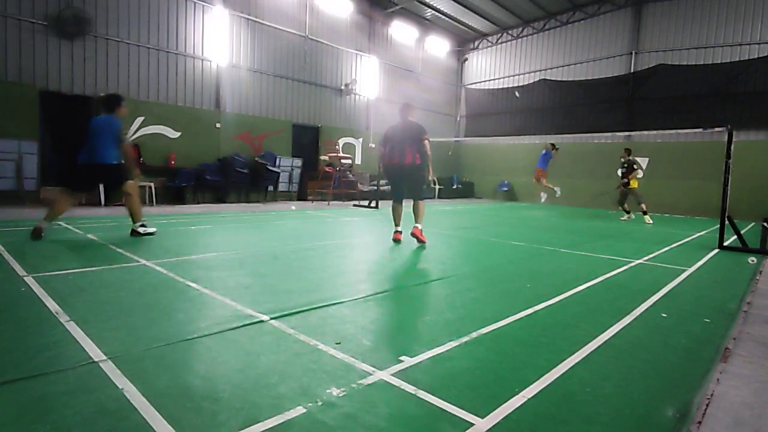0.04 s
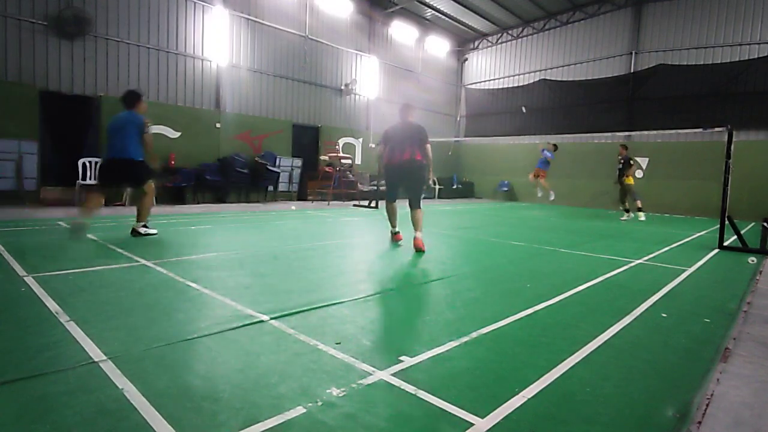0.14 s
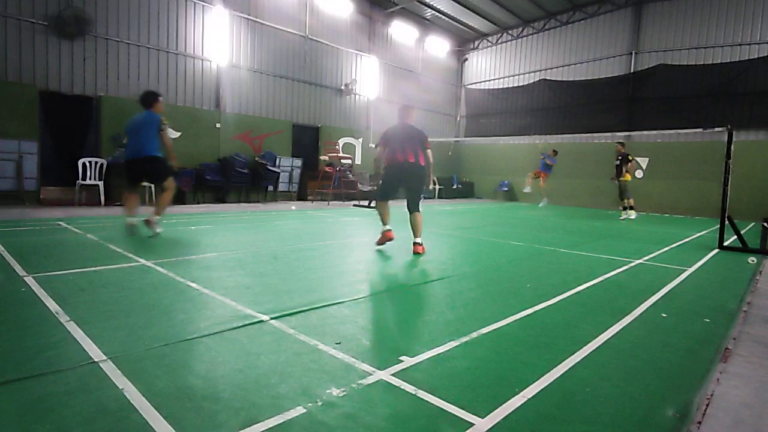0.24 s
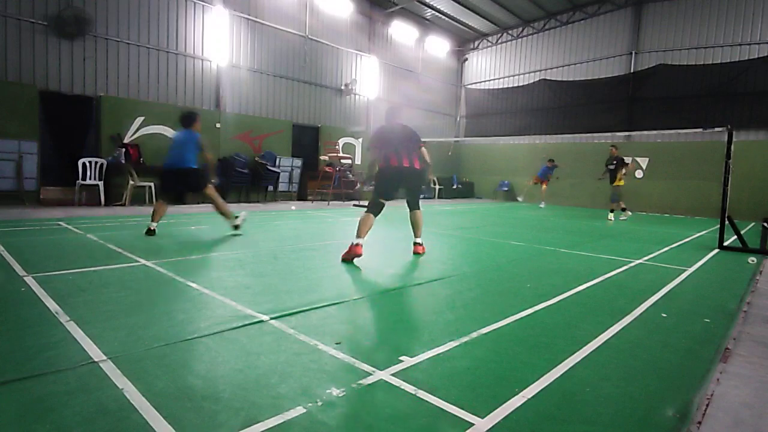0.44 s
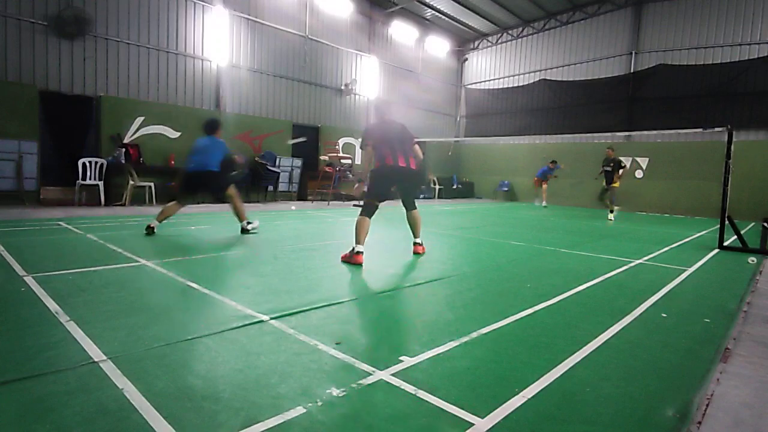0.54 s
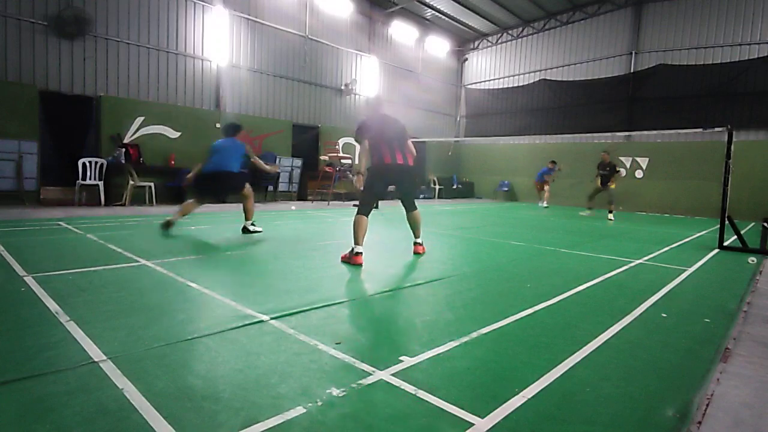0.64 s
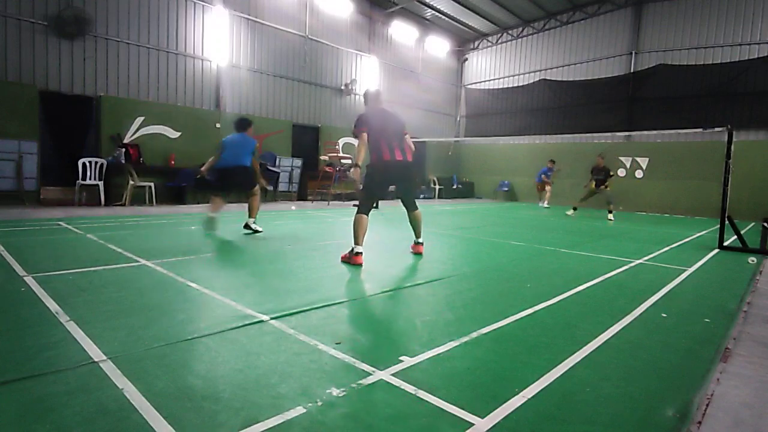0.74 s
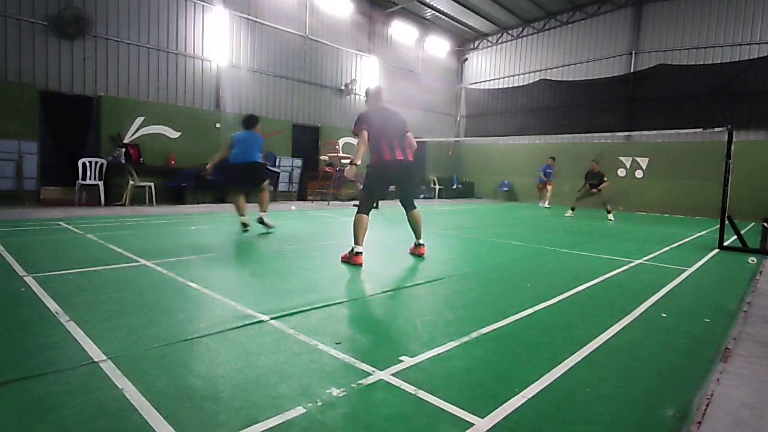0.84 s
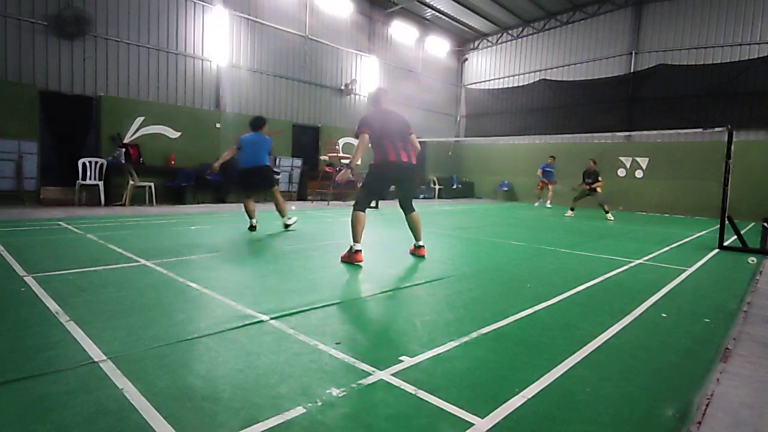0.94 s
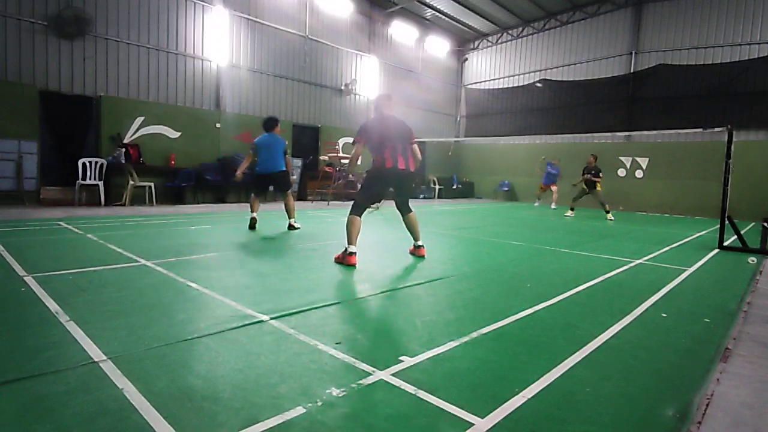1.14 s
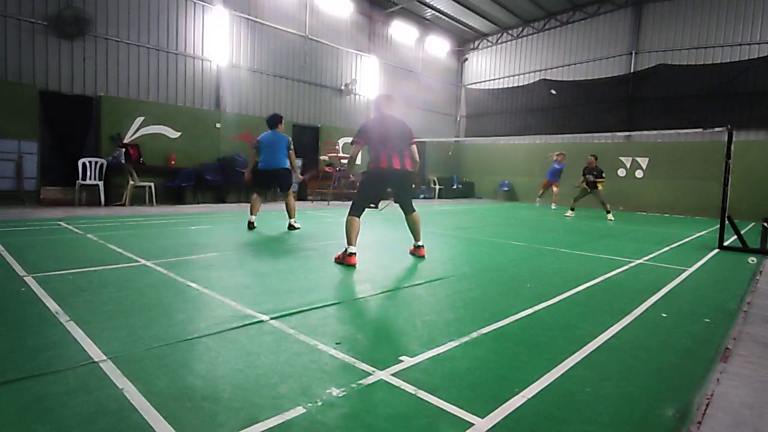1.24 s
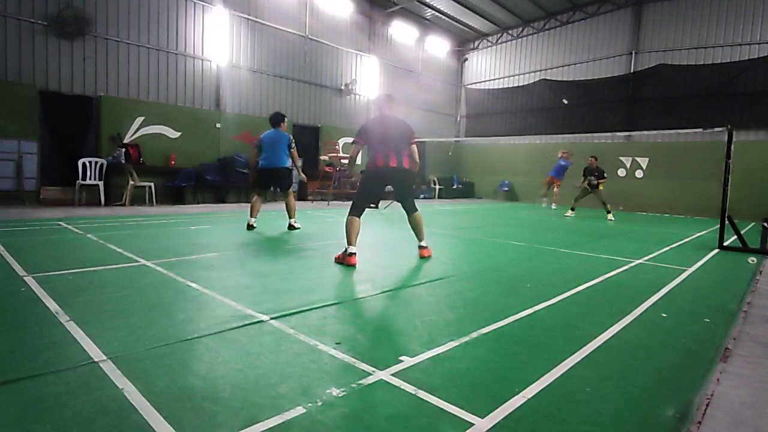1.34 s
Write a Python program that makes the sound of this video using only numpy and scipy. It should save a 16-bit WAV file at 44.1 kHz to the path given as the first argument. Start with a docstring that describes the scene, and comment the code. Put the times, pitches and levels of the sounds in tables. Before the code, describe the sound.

A badminton smash dominates: a sharp, dry crack at about 0.36 s, doubled by the floor, with a brief racket ring and a long bright roar in a large metal hall. Before it, an older squeak fades, and shoes scuff and squeak at 0.2-0.25 s. A dull thud, perhaps the return hit, lands at 0.75 s, then softer knocks until 1.0 s and a tiny squeak at 0.97 s, over low hum.

```python
"""A large sheet-metal hall: a badminton smash cracks, bounces off the floor and roars in a long bright tail.
Crack and hall are shaped noise; decaying sines ring the racket. Shoes squeak as rough tones with overtones and
scuff as a noise swell; dull thuds, the loudest perhaps the return hit, are decaying sines with a noise slap.
An earlier squeak still fades as narrow noise, and the hall hums as filtered noise with wavering low tones.
Two microphone ports colour left and right."""
import sys
import numpy as np
from scipy import signal
from scipy.fft import rfft, irfft, next_fast_len
from scipy.io import wavfile
from scipy.ndimage import uniform_filter1d

SR = 44100
rng = np.random.default_rng(int(sys.argv[2]) if len(sys.argv) > 2 else 0)


def pcm_store(signal):
    """Save signal as 16-bit PCM."""
    levels = np.round(np.clip(np.atleast_2d(signal), -1, 1) * 32767)
    wavfile.write(sys.argv[1], SR, levels.astype(np.int16).T)


N = 61739
T = np.arange(N) / SR  # seconds


def amp(db):
    """Decibels to an amplitude factor."""
    return 10 ** (np.asarray(db) / 20)


def unit(x):
    """Scale a signal to an RMS of 1."""
    return x / np.sqrt(np.mean(x ** 2) + 1e-20)


def along(points, hz):
    """Read a curve of (Hz, value) points on a log frequency axis."""
    point_hz, value = np.transpose(points)
    return np.interp(np.log(hz + 1), np.log(point_hz + 1), value)


def filtered(x, response):
    """Multiply the spectrum of x by a response of frequency."""
    size = next_fast_len(N + SR // 2)
    spectrum = rfft(x, size) * response(np.fft.rfftfreq(size, 1 / SR))
    return irfft(spectrum, size)[..., :N]


def peak(centre_hz, width_hz):
    """A causal resonance: it rings only after it is struck."""
    return lambda f: 1j * f * width_hz / (centre_hz ** 2 - f * f + 1j * f * width_hz)


def band_noise(shape, centre_hz, width_hz):
    """White noise through the same resonance twice, RMS 1."""
    noise = rng.standard_normal(shape)
    return unit(filtered(noise, lambda f: peak(centre_hz, width_hz)(f) ** 2))


def diffuse(pair):
    """Mix two unrelated signals into left and right, alike in the bass and mostly unrelated above."""
    # Each row: frequency in Hz, likeness of left and right (1 is identical, 0 unrelated).
    likeness = [(30, .99), (90, 0.67), (180, .87), (350, 0.79), (700, 0.16), (1400, -0.16), (3000, 0.02),
                (12000, -0.076)]
    turn = lambda hz: np.arccos(np.clip(along(likeness, hz), -1, 1)) / 2
    mid, side = filtered(pair, lambda hz: np.array([np.cos(turn(hz)), np.sin(turn(hz))]))
    return np.array([mid + side, mid - side])


def impulse(start_s, response):
    """One click with this colour, energy 1."""
    click = filtered(1. * (np.arange(N) == round(start_s * SR)), response)
    return click / np.linalg.norm(click)


def blow(start_s, rise_s, t60_s):
    """Envelope of something struck: fast rise, exponential fall."""
    t = np.clip(T - start_s, 0, None)
    return (1 - np.exp(-t / rise_s)) * amp(-60 * t / t60_s)


def swell(start_s, length_s):
    """Envelope of something rubbed: a rounded swell."""
    return np.sqrt(np.abs(np.sin(np.pi * np.clip((T - start_s) / length_s, 0, 1))))


def hall(x, wet_db, far_s=.081):
    """Reverberation: the near walls answer first, then the far walls and a tail that decays by frequency."""
    # Decay of the far tail. Each row: frequency in Hz, time to fall 60 dB in seconds.
    far_t60 = [(150, 3.7), (400, 1.25), (1000, 2.88), (3000, 2.9), (8500, 1.92), (14000, 1.52)]
    # Colour of the near walls' answer. Each row: frequency in Hz, level in dB.
    near_colour = [(200, -7.5), (600, -2), (2000, -2.5), (8000, -4), (13000, 2)]
    near_s, near_rise_s, near_t60_s = .006, .012, 0.54
    far_rise_s, fill_s, fill_share = .011, 0.15, 0.36  # this share builds up slowly over fill_s
    patchy_db = 2  # random unevenness over time and frequency

    hz, t, z = signal.stft(rng.standard_normal((2, N)), SR, nperseg=128)
    rise = lambda start_s, length_s: np.clip((t - start_s) / length_s, 0, 1)
    near_db = along(near_colour, hz)[:, None] - 60 * t / near_t60_s
    near = rise(near_s, near_rise_s) * amp(near_db)
    fill = (1 - fill_share) * rise(far_s, far_rise_s) + fill_share * rise(far_s, fill_s)
    far = fill * amp(-60 * t / along(far_t60, hz)[:, None])
    tail = signal.istft(z * np.hypot(near, far), nperseg=128)[1]

    z = signal.stft(tail, nperseg=1024)[2]
    patches = uniform_filter1d(rng.standard_normal(z.shape[1:]), size=3, axis=0)
    patches = uniform_filter1d(patches, size=6, axis=1)
    tail = signal.istft(z * amp(patchy_db * unit(patches)), nperseg=1024)[1][:, :N]
    tail = diffuse(tail / np.sqrt(np.mean(np.sum(tail ** 2, axis=1))))  # energy near 1 a channel
    return amp(wet_db) * signal.fftconvolve(x[None], tail, axes=1)[:, :N]


def hum():
    """Steady rumble and wash of the hall as coloured noise, with low tones wavering as narrow noise."""
    # Colour of the wash. Each row: frequency in Hz, relative level in dB per Hz.
    colour = [(15, -34), (25, -2), (176, -7.5), (427, -13), (749, -10), (1420, -12.5), (2240, -9.5),
              (3090, -14), (5420, -19), (8780, -15.5), (11500, -21), (13800, -38), (15000, -63)]
    # Unsteady low tones. Each row: frequency in Hz, width in Hz, level in dB.
    drones = [(42.7, 21, -49), (84.7, 17.6, -49.5), (181.8, 20, -49)]
    wash_db = -35
    noise = filtered(rng.standard_normal((2, N)), lambda hz: amp(along(colour, hz)))
    wash = amp(wash_db) * unit(diffuse(noise))
    return wash + sum(amp(db) * band_noise(N, hz, width_hz) for hz, width_hz, db in drones)


def old_squeak():
    """The tail of an earlier squeak: two narrow bands of noise fading away."""
    pitch_hz, width_hz, level_db, second_db, t60_s = 2290, 150, -34, -9.5, 1.8
    band = lambda ratio: band_noise((2, N), ratio * pitch_hz, ratio * width_hz)
    return amp(level_db - 60 * T / t60_s) * (band(0.97) + amp(second_db) * band(1.8))


def scuff():
    """A sole rubs over the floor: a brief swell of bright hiss."""
    start_s, length_s, level_db = 0.2, 0.066, -38.5
    hiss = band_noise((2, N), 8900, 4000)  # centre and width in Hz
    return amp(level_db) * swell(start_s, length_s) ** 2 * hiss


def thuds():
    """Dull thuds, the loudest perhaps the return hit, others perhaps distant footfalls: ring, slap and boom."""
    # Each row: start in seconds, level in dB, pitch in Hz, time to fall 60 dB in seconds, slap in dB relative
    # to the thud, hall boom in dB (independent of the thud's level), delay of the far walls in seconds.
    knocks = [(.023, -23, 1320, 0.039, 4, -13, 0.057), (.346, -11, 680, 0.013, -26, -7, 0.093),
              (.753, -6, 370.6, 0.026, -5, 7.5, 0.029), (.812, -16.5, 448, 0.065, -25, 5.5, 0.073),
              (.822, -21.5, 255, .12, -25, 0, 0.064), (.842, -17.5, 527, 0.072, -25, -2, 0.075),
              (.889, -22, 447, 0.064, -23, -2.5, 0.078), (.903, -22.5, 193, 0.095, -25, -6.5, .07),
              (.996, -13.5, 443, 0.04, -29, -10, 0.057)]
    rise_s, slap_t60_s, slap_hz, slap_width_hz = 0.0048, 0.016, 1840, 2500
    boom_spread = 1.18  # width over pitch of what fills the hall
    out = 0
    for start_s, db, hz, t60_s, slap_db, hall_db, far_s in knocks:
        ring = blow(start_s, rise_s, t60_s) * np.sin(2 * np.pi * hz * (T - start_s))
        slap = band_noise(N, slap_hz, slap_width_hz) * blow(start_s, rise_s, slap_t60_s)
        boom = impulse(start_s, lambda f: peak(hz, boom_spread * hz)(f) ** 2)
        out = out + amp(db) * (ring + amp(slap_db) * slap) + hall(boom, hall_db, far_s)
    return out


def squeaks():
    """A rubber sole sticks and slips: short, rough tones with overtones, most of them falling."""
    # Each row: start in seconds, length in seconds, pitch in Hz, glide in Hz per second, roughness as RMS
    # share of the pitch, level in dB, 2nd, 3rd and 4th harmonic in dB relative to the fundamental,
    # echo and hall in dB relative to the tone.
    slips = [(0.209, 0.026, 2184, 0, .05, -41, -5, 1.5, 3.5, -11, 8.5),
             (0.2392, 0.0064, 2150, -6000, 0.018, -21.5, -3.5, -12, -15, -12, 1.5),
             (0.244, 0.0082, 2109, -6000, 0.028, -21, 1, -9, -13.5, -11.5, -0.5),
             (.972, 0.0097, 1776, -5000, .015, -26, 4.5, -30, -35, -17, -5),
             (.982, 0.0069, 1696, -5000, .02, -30.5, 7, -21, -30, -22, -11)]
    echo_s = .079  # delay of the clear echo from the end wall
    out = 0
    for start_s, length_s, hz, glide, rough, db, second_db, third_db, fourth_db, echo_db, hall_db in slips:
        jitter = rough * unit(uniform_filter1d(rng.standard_normal(N), size=40))
        pitch = (hz + glide * np.clip(T - start_s, 0, length_s)) * (1 + jitter)
        phase = 2 * np.pi * np.cumsum(pitch) / SR
        harmonics_db = (0, second_db, third_db, fourth_db)
        tone = sum(amp(d) * np.sin(phase * (k + 1)) for k, d in enumerate(harmonics_db))
        tone = amp(db) * swell(start_s, length_s) * tone
        echo = amp(echo_db) * np.roll(tone, round(echo_s * SR))
        out = out + tone + echo + hall(tone, hall_db)
    return out


def smash():
    """Strings and cork crack, the racket rings, the floor repeats the crack and the hall roars."""
    # Colour of the direct crack. Each row: frequency in Hz, relative level in dB per Hz.
    crack_colour = [(100, -32), (200, -10), (1000, 3), (2500, 3), (3500, -7.5), (5000, 2), (6000, -19),
                    (7500, 3), (10500, 9), (14000, -3), (15000, 6.5)]
    # Colour of what fills the hall. Each row: frequency in Hz, relative level in dB per Hz.
    roar_colour = [(60, -47), (150, -14), (290, -5.5), (480, -6), (680, -1), (900, -2.5), (1150, -5.5),
                   (1500, -7.5), (2100, -8.5), (4300, -8), (5700, -8.5), (7200, -5), (8600, -2),
                   (10500, -4), (12000, -9), (14000, -17.5), (14500, -45)]
    # Racket frame and strings. Each row: frequency in Hz, level in dB, time to fall 60 dB in seconds.
    frame = [(237.6, -23, 0.071), (316, -22.5, 0.092), (677, -21, 0.065), (976, -15, 0.028),
             (1223, -17, .02)]
    start_s, crack_db, rise_s, crack_t60_s = .3608, .5, .001, .014
    bounce_s, hall_db = .0043, 25.5  # the floor bounce is as loud as the crack

    noise = filtered(rng.standard_normal((2, N)), lambda hz: amp(along(crack_colour, hz)))
    noise = unit(diffuse(noise))
    burst = blow(start_s, rise_s, crack_t60_s)
    burst = burst + blow(start_s + bounce_s, rise_s, crack_t60_s)
    ring = sum(amp(db) * blow(start_s, rise_s, t60_s) * np.sin(2 * np.pi * hz * (T - start_s))
               for hz, db, t60_s in frame)
    roar = hall(impulse(start_s, lambda hz: amp(along(roar_colour, hz))), hall_db)
    return amp(crack_db) * noise * burst + ring + roar


def scene():
    """The hall's hum, the shoes, the thuds and the smash together."""
    return hum() + old_squeak() + scuff() + thuds() + squeaks() + smash()


def record(dry):
    """Two microphone ports colour left and right differently; the top treble is faint, then cut off."""
    # Each row: frequency in Hz, left minus right in dB.
    port_difference = [(100, -0.5), (180, 2), (400, 0), (3000, 0), (5500, -2), (7000, -1.5), (8700, -14),
                       (10000, 3.5), (11500, 7.5), (13500, 1.5)]
    treble_end_hz, top_hz = 14300, 15600  # 30 dB down above the first, silent from the second
    ports = lambda hz: amp(along(port_difference, hz) * np.array([[.5], [-.5]]))
    treble = lambda hz: np.where(hz < treble_end_hz, 1, amp(-30)) * (hz < top_hz)
    return filtered(dry, lambda hz: ports(hz) * treble(hz))


dry = scene()
out = record(dry)
pcm_store(out)
```